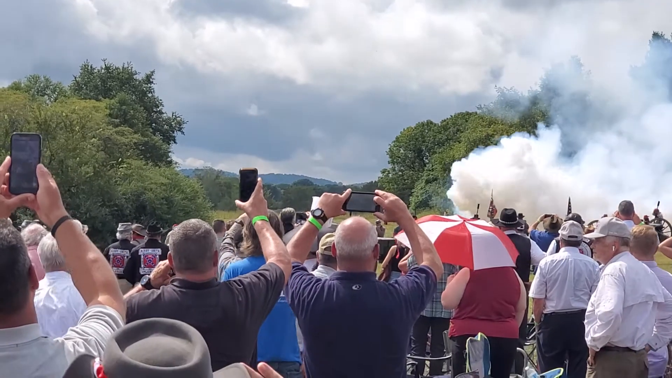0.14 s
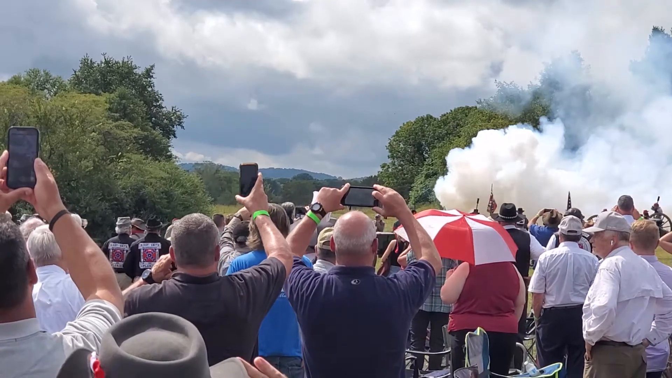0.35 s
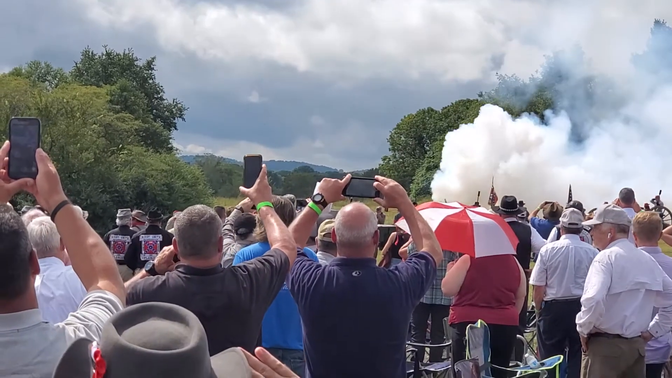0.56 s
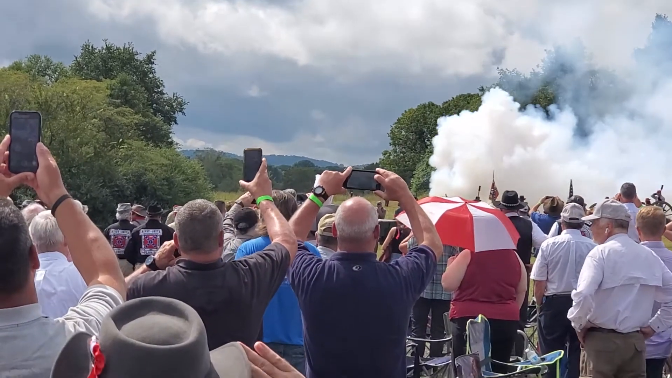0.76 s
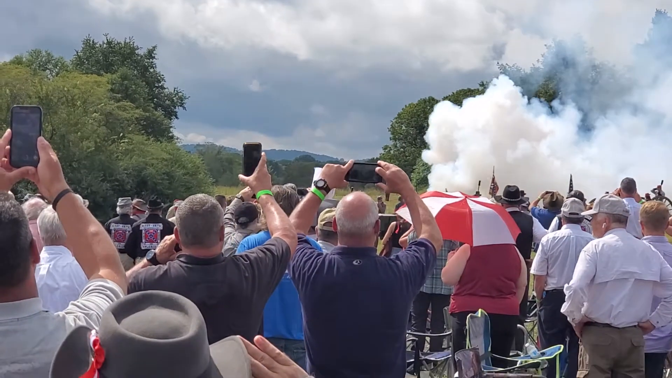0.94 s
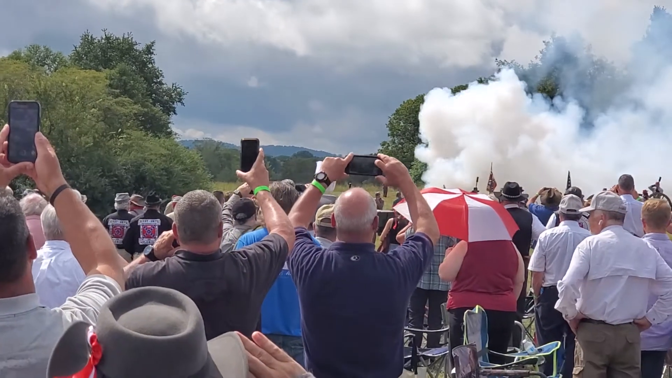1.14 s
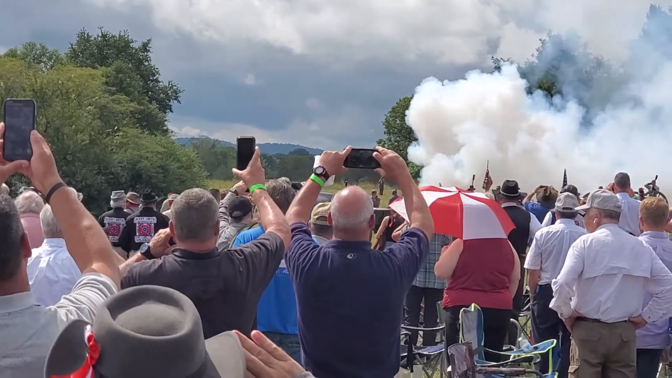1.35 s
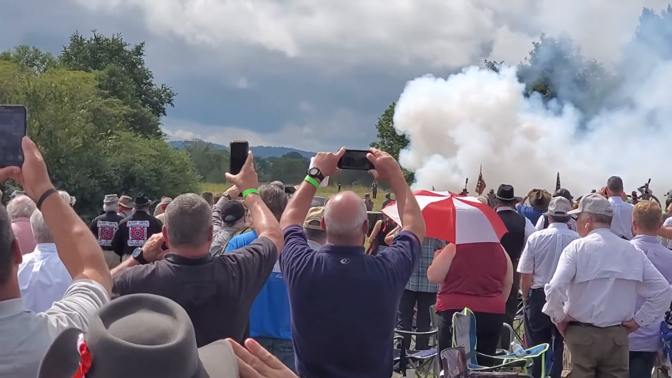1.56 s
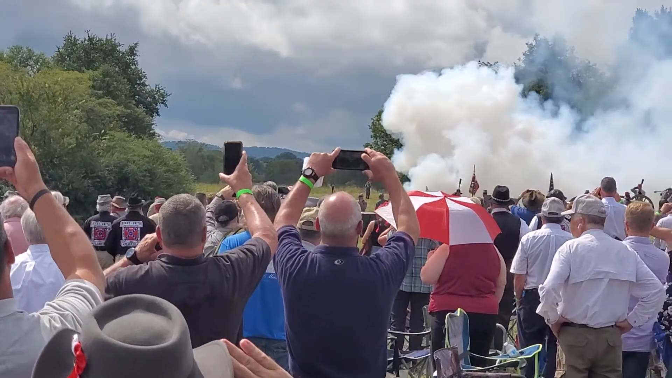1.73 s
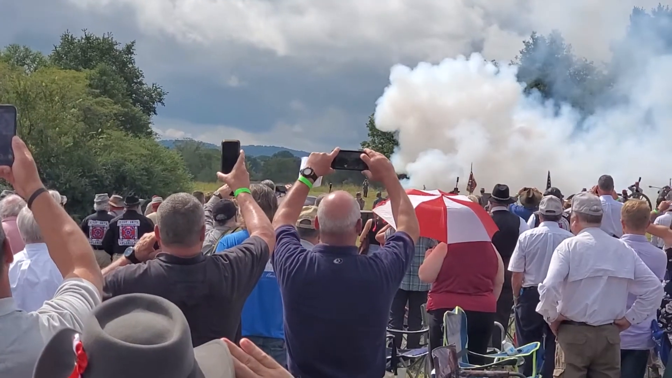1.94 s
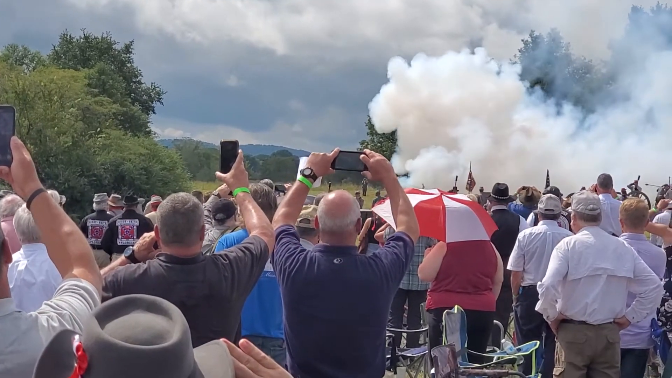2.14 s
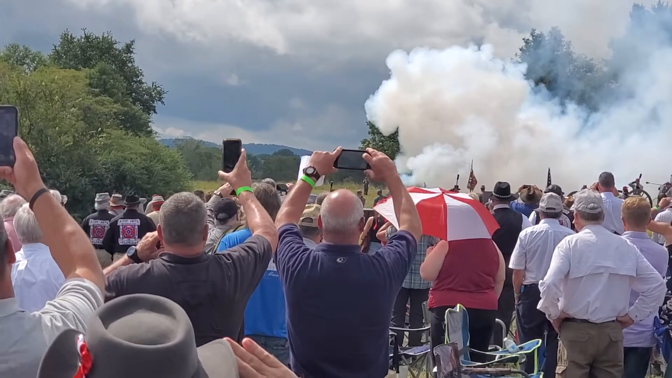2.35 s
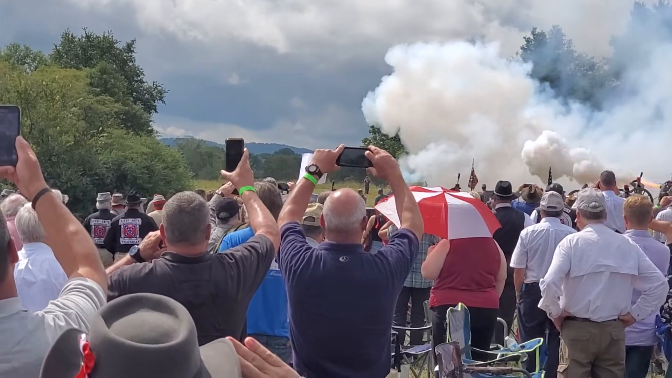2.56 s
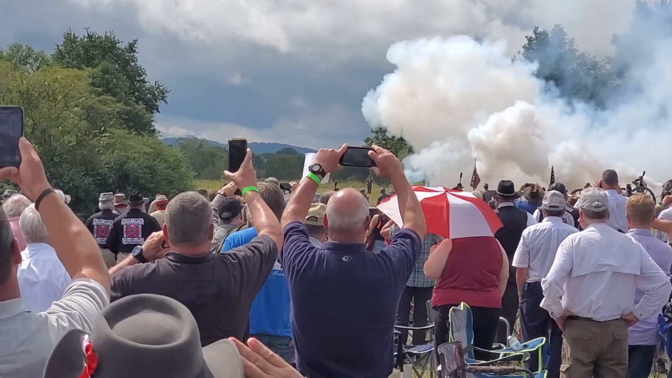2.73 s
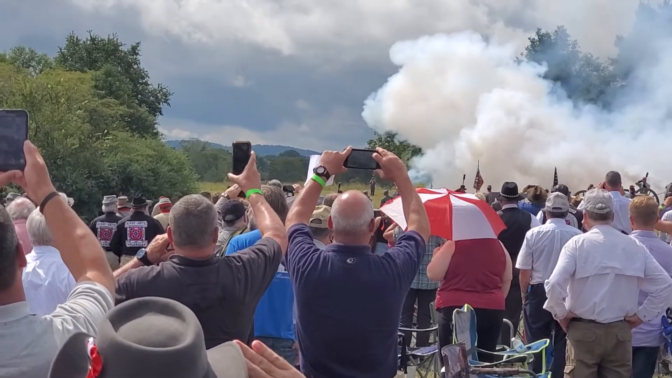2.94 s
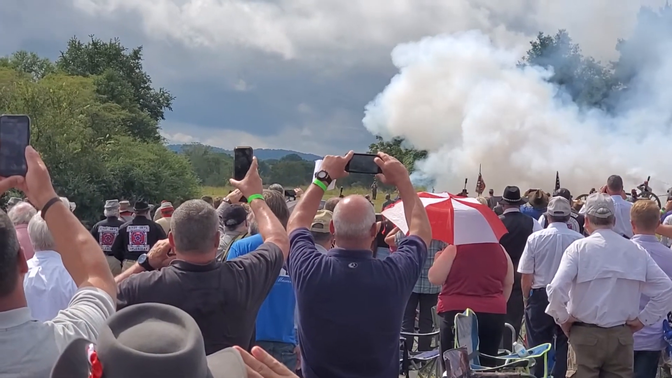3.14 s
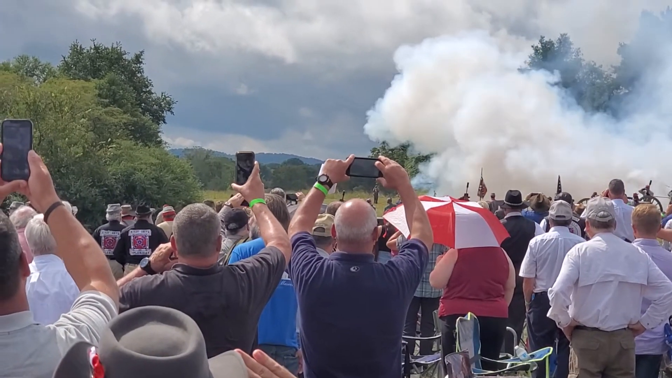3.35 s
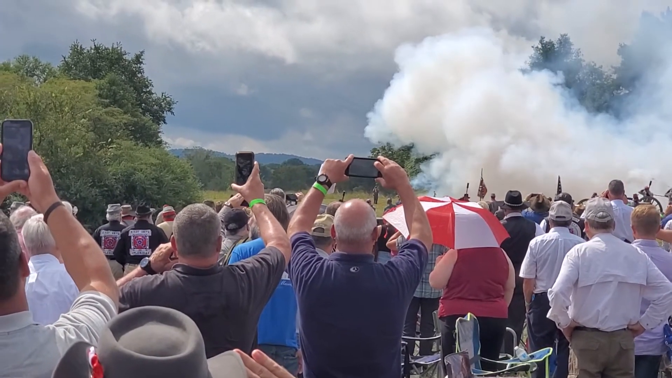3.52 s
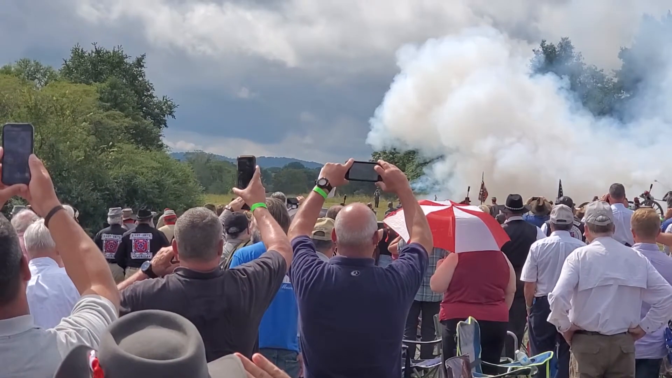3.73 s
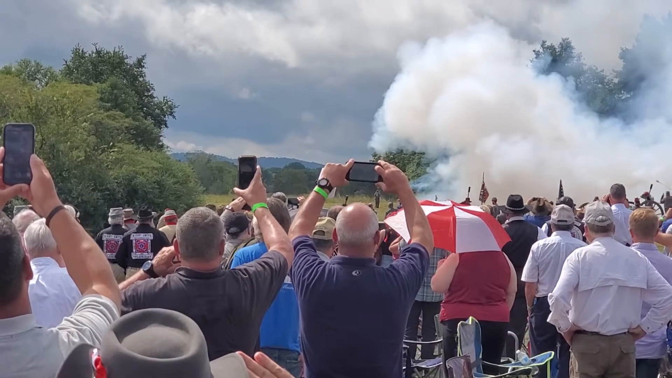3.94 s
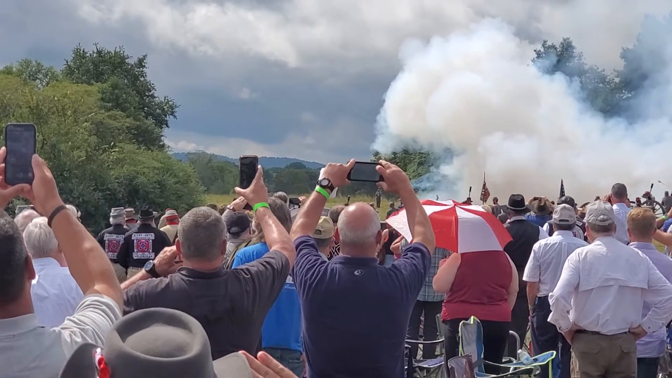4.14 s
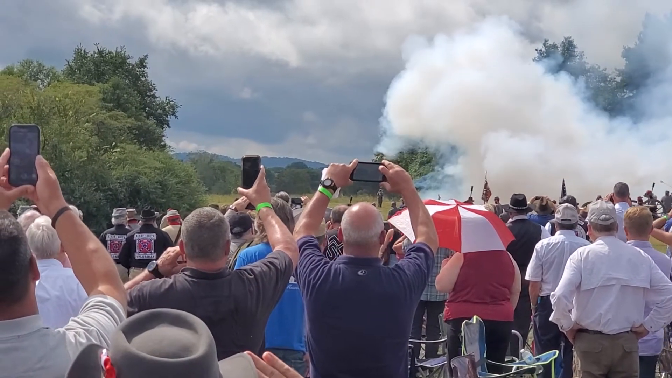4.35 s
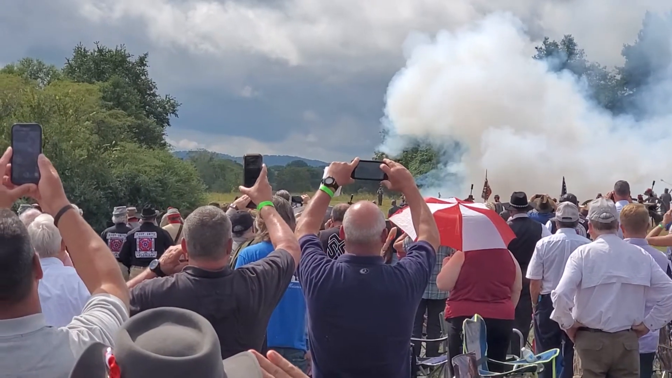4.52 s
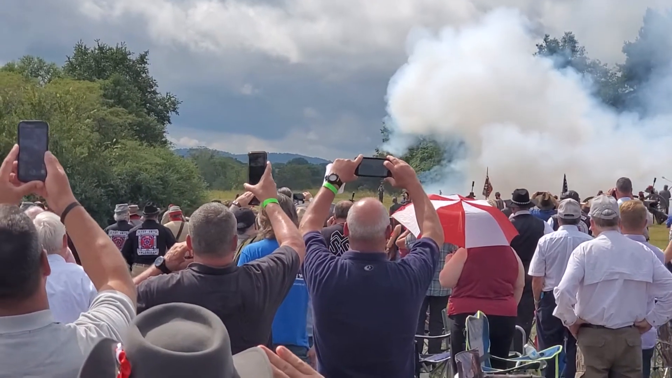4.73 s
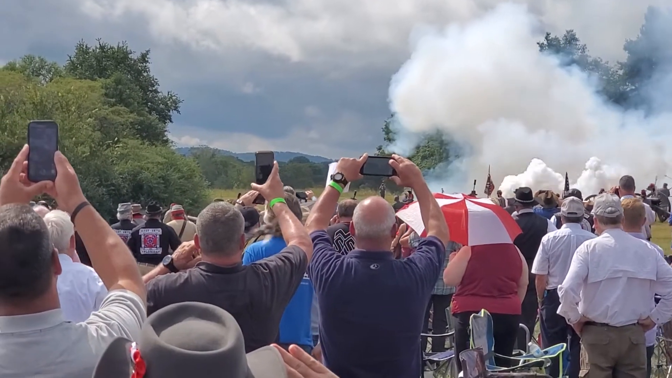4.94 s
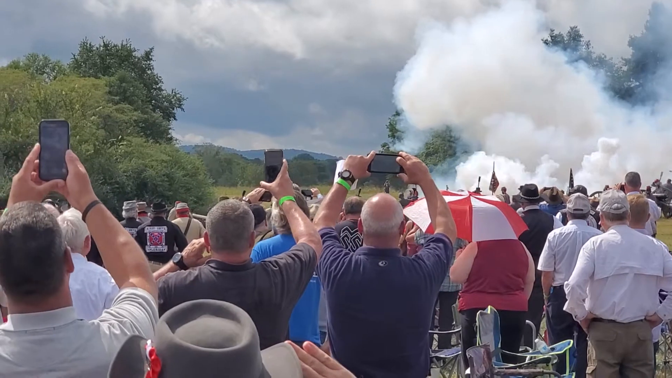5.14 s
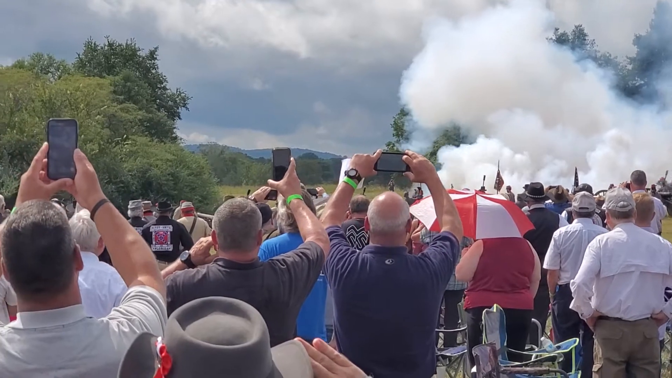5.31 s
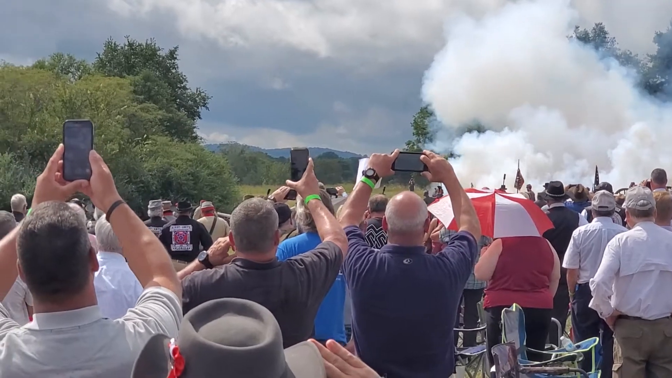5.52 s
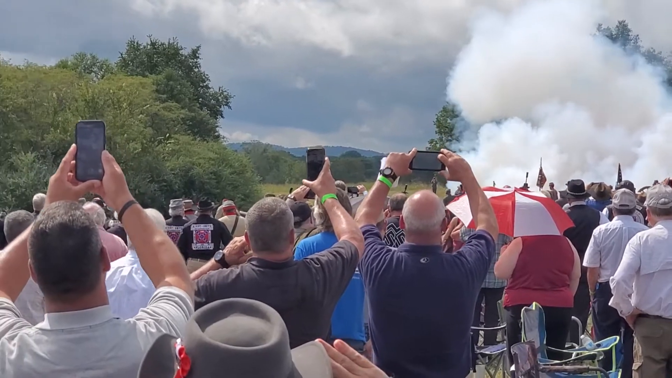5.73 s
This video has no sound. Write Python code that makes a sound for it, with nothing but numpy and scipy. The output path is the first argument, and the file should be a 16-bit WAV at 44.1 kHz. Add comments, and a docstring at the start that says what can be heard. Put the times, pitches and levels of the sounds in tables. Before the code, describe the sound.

Open meadow with tree lines and distant hills, heard on a phone's two microphones. At 0 seconds a black-powder cannon blast is already under way: a deep boom, then overlapping low thumps and a ragged leafy hiss, strongest around 0.3 to 0.8, with a sharper slap near 0.55. Echoes drift left, lose treble and sink into rolling rumble, with weak slaps near 1.5 and 2.15. A faint hiss swells just before the second shot at 2.66, a crisp double crack and low punch, with a somewhat lighter echo tail fading through 4 seconds. Small close clicks, louder left, come around 2.6, 3.85 to 4.0 and 4.9; thin wavering insect tones surface near 2, 4 and 4.9, over tiny rapid chirps and a soft steady air murmur. Faint slap echoes dot 4.2 to 4.75. At 5.06 the third shot lands, heavy and blunt, its thudding echoes, hiss and rumble still rolling at the end, about 6 seconds.

```python
"""A meadow ringed by tree lines and far hills, heard through the two ports of a phone: three black-powder cannon shots.
Each blast comes straight, as sharp fronts and low swings; the landscape returns it as thumps, boom, rumble and hiss.
Filtered two-port noise makes boom, rumble and hiss; the hiss loses treble and the echoes swing to the left.
Faint clicks, insect tones, chirps and a steady murmur of air fill the pauses."""
import sys
import numpy as np
from scipy import signal
from scipy.io import wavfile
from scipy.ndimage import uniform_filter1d, minimum_filter1d

SR = 44100
rng = np.random.default_rng(int(sys.argv[2]) if len(sys.argv) > 2 else 0)


def log_audio(samples):
    """Write samples as a 16-bit WAV file to the path given in sys.argv[1]."""
    # one column per channel
    frames = np.atleast_2d(samples).T
    # limit to full scale, then quantise
    limited = np.clip(frames, -1, 1)
    pcm = np.round(limited * 32767).astype(np.int16)
    wavfile.write(sys.argv[1], SR, pcm)


N = 259308  # samples

# firings that wake the landscape: start_s, rumble_db, boom_db, hiss_db, added_loss_db_per_khz,
# nearest_returns_db, slopes_lag_ms
SHOTS = [(-.073, 0, -0.5, 0, 0, -0.5, -4), (2.663, -5.5, -4.5, -4.5, 0, -7.5, 2.5),
         (5.062, -1, 0.5, 0, 0, -1, 4.5)]
# direct blasts: peak_s, hiss_db, loss_db_per_khz (at the peak), boom_db
MUZZLES = [(-.04, -16.5, 2, -5), (2.661, -29, 1.2, -27), (2.683, -16, 1.03, -12.5), (5.047, -37.5, .2, -20),
           (5.057, -22.5, 6, -11), (5.067, -17, 5, -3), (5.096, -20.5, 0.8, -5)]
# lows sent back by the landscape: after_shot_s, rumble_db, boom_db
LOWS = [(-.015, -56, -71), (.01, -3, -40), (.06, -17, -20), (.14, -23.5, -14), (.24, -22.5, -24),
        (.3, -18.5, -19), (.44, -10.5, -25), (.6, -17.5, -24.5), (.7, -14, -31), (.8, -17.5, -23),
        (.9, -24.5, -31.5), (1.02, -26.5, -39), (1.17, -21.5, -34), (1.5, -30, -43), (2.05, -28.5, -44),
        (2.3, -32.5, -45.5), (2.7, -34.5, -44.5), (6, -41, -89)]

MUZZLE_RISE_DB_PER_S, MUZZLE_FALL_S = 2200, 0.071


def amp(db):
    """Amplitude factor of a level in dB."""
    return 10 ** (np.asarray(db) / 20)


def read(points, hz):
    """Value of a spectrum table on a log-frequency axis."""
    f, value = np.transpose(points)
    return np.interp(np.log(hz + 1), np.log(f + 1), value)


def follow(rows, t):
    """Every column of a time table at the times t."""
    s, *columns = np.transpose(rows)
    return [np.interp(t, s, column) for column in columns]


def add(mix, start_s, sound):
    """Mix a sound in at its start, cut at the end of the mix."""
    part = mix[..., max(round(start_s * SR), 0):][..., :sound.shape[-1]]
    part += sound[..., :part.shape[-1]]


def summed(levels_db):
    """Level of several unrelated sounds heard together: powers add."""
    return 10 * np.log10(sum(amp(db) ** 2 for db in levels_db))


def grid(size):
    """Frame times and bin frequencies of short-time spectra."""
    frame_s = np.arange(4 * N // size + 5) * size / 4 / SR
    return frame_s, np.fft.rfftfreq(size, 1 / SR)[:, None]


def patches(size, frames, bins):
    """Smooth random field over frequency and time, rms 1."""
    t, hz = grid(size)
    field = rng.standard_normal((len(t), len(hz)))
    field = uniform_filter1d(field, frames, axis=0)
    field = uniform_filter1d(field, bins, axis=1).T
    return field / field.std()


def noise(colour, shape_db, lead_ms, like, size):
    """Coloured two-port noise shaped over time and frequency; path difference delays the right port by lead_ms."""
    # port imbalance, scaled by the shading below: pitch_hz, left_minus_right_db
    ports = [(300, 0.5), (520, 1), (1000, -4.5), (1700, -5.5), (2600, -0.5), (4400, 1.5), (8000, 2.5),
             (12000, -2.5)]
    t, hz = grid(size)
    a, b, c, d = rng.standard_normal((len(t), len(hz), 4)).T
    shared = a + 1j * b
    own = c + 1j * d
    like = np.clip(like, 0, 1) ** (hz / (hz + 900))  # long waves reach both ports alike
    late = np.exp(-2j * np.pi * hz * lead_ms / 1000)
    z = np.array([shared, late * (like * shared + np.sqrt(1 - like ** 2) * own)])
    shade = 0.7 + 0.65 * np.clip(lead_ms, 0, 0.3)  # the phone's body shades sound from the side more
    z *= amp(read(ports, hz) * shade * np.array([0.5, -0.5])[:, None, None])
    gain = amp(read(colour, hz))
    z *= gain / np.linalg.norm(gain) * amp(shape_db) * size ** 0.5
    return signal.istft(z, nperseg=size, noverlap=3 * size // 4, scaling="psd")[1][:, :N]


def bearing(t):
    """Left-port lead in ms and likeness of the ports, set by where sound arrives from after the latest shot."""
    # after_shot_s, left_lead_ms, likeness (0-1)
    directions = [(0, -0.11, .6), (.12, -0.086, .1), (.128, .4, 0.76), (.175, .4, .7), (.2, .1, 0.2),
                  (.215, 0.11, 0.4), (.34, .11, 0.15), (.39, 0.066, 0.64), (.5, 0.089, 0),
                  (.62, 0.27, 0.55), (.82, .3, 0.16), (.99, 0.19, 0), (1.02, 0.51, 0.8), (1.25, 0.47, 0.77),
                  (1.5, 0.486, 0.2), (2.0, 0.41, 0.44), (2.8, 0.45, 0.4)]
    fired_s = np.transpose(SHOTS)[0]
    return follow(directions, t - fired_s[np.searchsorted(fired_s, t) - 1])


def muzzle(t, peak_s, fall_db):
    """Relative level in dB around a blast: a steep rise, then a fall that slows down."""
    rise_db = -MUZZLE_RISE_DB_PER_S * np.clip(peak_s - t, 0, 0.1)
    return rise_db - fall_db * np.log1p(np.maximum(t - peak_s, 0) / MUZZLE_FALL_S)


def cracks():
    """A push and its suction, then a short spray of ground reflections, dulled by the way travelled."""
    # sharp fronts of blasts and slap echoes: start_s, level_db (before filters), blur_ms, spray_t60_s
    fronts = [(0.546, -11.5, 0.058, .03), (1.507, -17, 0.14, 0.095), (2.145, -25.5, 0.1, 0.018),
              (2.6597, -7.5, 0.041, 0.011), (2.6809, -0.5, 0.055, 0.13), (4.162, -24.5, 0.078, 0.054),
              (4.244, -33, 0.07, 0.049), (4.532, -24, 0.15, 0.014), (4.752, -26.5, .1, 0.022),
              (5.0685, 6, 0.19, 0.033), (5.0714, -3.5, 0.02, 0.018), (5.085, -1.3, 0.025, 0.085)]
    pulse_s, bounce_s = 0.00085, 0.00151
    out, t = np.zeros((2, N)), np.arange(6000) / SR
    spray = rng.standard_normal((len(fronts), 2, len(t)))
    for (start_s, level_db, blur_ms, t60_s), grit in zip(fronts, spray):
        lead_s = bearing(start_s)[0] / 1000
        delay_s = np.array([[max(-lead_s, 0)], [max(lead_s, 0)]])
        u = np.maximum(t - delay_s, 0) / pulse_s
        grit = (grit + 0.49 * grit[0]) * amp(-15.0 - 60 * t / t60_s)
        front = ((1 - u) * np.exp(-u) + grit) * (u > 0)
        front = front + 0.86 * np.roll(front, round(bounce_s * SR), axis=1)  # bounce off the ground
        keep = np.exp(-1000 / (blur_ms * SR))
        front = signal.lfilter([(1 - keep) ** 2], [1, -2 * keep, keep ** 2], front)
        add(out, start_s, amp(level_db) * front)
    return signal.sosfilt(signal.butter(2, 300, "high", fs=SR, output="sos"), out)


def thumps():
    """The blast, and each broad surface that throws it back, give short low swings: cosines in a bell."""
    # swings of the blast itself: centre_s, level_db, pitch_hz, bell_sigma_ms
    blows = [(2.6805, -1, 95, 4.3), (2.683, -14.5, 702, 3.3), (2.694, -2.5, 91, 4.7),
             (2.709, -4.5, 80, 4.4), (5.058, -9.5, 71, 9.1), (5.069, -6, 347, 4.1),
             (5.086, -29.5, 127, 6.6), (5.101, -8, 304, 2), (5.118, -10, 260, 3)]
    # reflecting surfaces: after_shot_s, pitch_hz, bell_sigma_ms, gun_1_db, gun_2_db, gun_3_db
    slopes = [(.072, 125, 2.4, -13, -20, -1), (.115, 141, 3.7, -6, -35, -7),
              (0.153, 110, 3.6, -1.5, -14.5, -4), (.19, 125, 4.6, -6, -27, -3),
              (.225, 121, 4, -20, -27, -6), (.283, 121, 2, -5, -12, -15), (0.316, 76, 8, -3, -5, 0),
              (0.407, 98.6, 6.7, -1.5, -8.5, -7), (0.443, 82, 11, -9, -9, -10),
              (0.501, 90, 4.8, -3.5, -7.5, -2), (0.574, 88, 6.9, -12, -7.5, -8),
              (0.637, 94, 6.6, -6, -11, -16), (.695, 67, 4, -9.5, -24, -7), (.748, 90, 6.8, -2.5, -6, -7),
              (0.818, 84, 7.1, -7, -13, -8.5), (.93, 71, 13.5, -16, -17, -15),
              (0.999, 75, 12.5, -13, -39, -15), (1.147, 89, 9.4, -12, -15.5, -10),
              (1.181, 95, 6.7, -11.5, -15.5, -10), (1.234, 87, 8.7, -14, -20, -14),
              (1.312, 87, 7.2, -16.5, -31, -16), (1.381, 74, 4, -22, -26, -15.5),
              (1.788, 61.4, 7.2, -22.5, -18, -20), (1.912, 77, 13, -17.5, -27.5, -20),
              (2.069, 67, 4.2, -13, -20.5, -13)]
    out = np.zeros(N)
    t = np.arange(-2400, 2400) / SR
    returns = [(shot_s + late_s + lag_ms / 1000, db[gun], hz, ms)
               for gun, (shot_s, *_, lag_ms) in enumerate(SHOTS)
               for late_s, hz, ms, *db in slopes]
    for centre_s, level_db, pitch_hz, sigma_ms in blows + returns:
        swing = np.cos(2 * np.pi * pitch_hz * t) * np.exp(-0.5 * (1000 * t / sigma_ms) ** 2)
        swing = swing * signal.windows.tukey(len(t), 0.5)
        swing = amp(level_db) * (swing - swing.mean() * 2 * np.hanning(len(t)))  # no net pressure
        start_s = centre_s + t[0]
        add(out, start_s, swing[max(-round(start_s * SR), 0):])
    return out


def boom():
    """The chesty middle of the blast and its echoes, noise lumpy from trunk to trunk."""
    # pitch_hz, relative_level_db
    colour = [(60, -10.5), (110, -0.5), (160, 4.5), (230, -7.5), (310, -9.5), (390, -17), (480, -30),
              (600, -24.5), (900, -55), (2000, -58)]
    near_s, fall_db = 0.17, 18
    t = np.arange(N) / SR
    levels_db = []
    for shot_s, _, boom_db, _, _, near_db, _ in SHOTS:
        near = np.clip(2 - (t - shot_s) / near_s, 0, 1)  # full until near_s, gone at twice that
        levels_db.append(follow(LOWS, t - shot_s)[1] + boom_db + near_db * near)
    for peak_s, _, _, boom_db in MUZZLES:
        levels_db.append(boom_db + muzzle(t, peak_s, fall_db))
    lumps_db = 3.02 * patches(size=1024, frames=4, bins=8)
    lead_ms, _ = bearing(grid(size=1024)[0])
    return amp(summed(levels_db)) * noise(colour, lumps_db, lead_ms, 0.81, size=1024)


def hiss():
    """Leaves scatter the crack into noise; the air takes more on longer paths, steeply so in the treble."""
    # foliage returns: after_shot_s, level_db, loss_db_per_khz (slope at 4 kHz), trunk_knock_db
    leaves = [(.1, -58, -1, 0), (.122, -47, 1, 2), (.132, -34, 0.45, -2), (.165, -34.5, 0.5, 1),
              (.19, -42, 1.5, -1), (.21, -41, 0.5, -3), (.225, -30, -0.13, -6), (.26, -26.5, 0, 5),
              (.3, -25, 0.53, 8), (.36, -26.5, 1, -3), (.41, -17.5, 1.45, -4), (.5, -27, 1.4, -1.5),
              (.555, -27.5, 1.9, 4), (.59, -30, 1.54, 2), (.62, -30.5, 2, 6), (.655, -33.5, 1.5, 4),
              (.7, -29, 2, -3.5), (.745, -24, 2.6, 5), (.785, -27, 2, 1), (.82, -25.5, 2.5, 6.5),
              (.88, -32, 3, 3), (.99, -44, 4, 0), (1.02, -38.5, 1.63, -2), (1.17, -33.5, 3, -0.5),
              (1.28, -36.5, 3, -2), (1.6, -42, 2.5, -4), (2.0, -47, 6, 1.5), (2.25, -49.5, 7, -8.5),
              (6, -83, -2, 3)]
    # pitch_hz, relative_level_db
    colour = [(200, -38), (450, -9.5), (620, 0.5), (850, -2.5), (1300, -1), (2500, -1), (4000, -2),
              (4900, -8), (5800, -2), (8300, -4), (9500, -13.5), (12500, -5), (14500, -10), (16000, -11)]
    trunk_hz, trunk_octaves = 1080, 0.99
    fall_db, dulling_db_per_khz = 27, 0.9
    swell_s, swell_rise_s, swell_db, swell_loss_db_per_khz = 2.36, 0.12, -43, 2
    t, hz = grid(size=256)
    khz = ((hz / 1000) ** 1.5 - 2 ** 1.5) / 3  # bent axis: 0 at 2 kHz, slope 1 at 4 kHz
    # a faint hiss swells just ahead of the second shot
    swell = swell_db - 40 * np.exp(-np.maximum(t - swell_s, 0) / swell_rise_s)
    parts_db = [swell - 99 * (t > SHOTS[1][0]) - swell_loss_db_per_khz * khz]
    trunks = np.exp(-(np.log2((hz + 1) / trunk_hz) / trunk_octaves) ** 2)
    for shot_s, _, _, hiss_db, added_loss, *_ in SHOTS:
        level_db, loss, knock_db = follow(leaves, t - shot_s)
        echo_db = level_db + hiss_db - (loss + added_loss) * khz + knock_db * trunks
        parts_db.append(echo_db - 99 * (t < shot_s))
    for peak_s, hiss_db, loss, _ in MUZZLES:
        loss = loss + dulling_db_per_khz * np.clip((t - peak_s) / MUZZLE_FALL_S, 0, 2)
        parts_db.append(hiss_db + muzzle(t, peak_s, fall_db) - loss * khz)
    crowns_db = 1.54 * patches(size=256, frames=30, bins=5)  # each tree answers in its own colour
    # trunks and boughs slap back briefly
    slaps_db = 1.106 * np.minimum(patches(size=256, frames=8, bins=12) ** 2, 7)
    return noise(colour, summed(parts_db) + crowns_db + slaps_db, *bearing(t), size=256)


def rumble():
    """Many far slopes return the lowest part of the blast, dense and rolling."""
    # pitch_hz, relative_level_db
    colour = [(15, -20), (30, -29), (50, 6.5), (75, 4), (110, -5), (170, -17), (300, -51.5), (600, -119)]
    t = np.arange(N) / SR
    level_db = summed(follow(LOWS, t - shot_s)[0] + rumble_db for shot_s, rumble_db, *_ in SHOTS)
    lead_ms, _ = bearing(grid(size=4096)[0])
    return amp(level_db) * noise(colour, 0, lead_ms, 0.95, size=4096)


def ticks():
    """Clicks close by: a short rough ring over a puff of the highest treble, louder in the left port."""
    # start_s, level_db (before port gains)
    clicks = [(2.5485, -49.5), (2.5755, -51.5), (2.6234, -45), (3.852, -40), (3.9074, -54.5), (3.9958, -41),
              (4.0114, -41.5), (4.8724, -48), (4.9685, -46.5)]
    ring_hz, rise_s, t60_s = 6300, 0.001, 0.035
    out, t = np.zeros(N), np.arange(1500) / SR
    draws = rng.standard_normal((len(clicks), len(t) + 3))
    soft = np.minimum(t / rise_s, 1) * amp(-60 * t / t60_s)
    for (start_s, level_db), draw in zip(clicks, draws):
        ring = 4.6 * uniform_filter1d(draw[3:], size=40) * np.sin(2 * np.pi * ring_hz * t)
        puff = 0.093 * np.diff(draw, 3)
        add(out, start_s, amp(level_db) * soft * (ring + puff))
    return out * amp([[2.0], [-3.0]])


def insect():
    """Two thin sine tones whose pitch and level waver at random."""
    # before waver and port gains: time_s, high_tone_db, low_tone_db
    calls = [(1.6, -92, -95), (1.97, -67, -91), (2.4, -87, -88), (3.85, -100, -100), (3.95, -58, -81),
             (4.3, -80, -90), (4.42, -65, -80), (4.6, -70, -64), (4.93, -64, -65), (5.04, -67, -92),
             (5.1, -95, -93.5)]
    # centre pitches: high_hz, low_hz
    tones_hz = [5865, 2859]
    sink_hz, waver_hz, waver_db = 200, 22, 3.8
    t = np.arange(N) / SR
    waver = uniform_filter1d(rng.standard_normal((N, 4)), 900, 0).T * 30  # rms 1
    # the high tone sinks as its last call ends
    sink = sink_hz * np.clip((t - 4.9) / 0.14, 0, 1) * [[1], [0]]
    pitch_hz = np.transpose([tones_hz]) - sink + waver_hz * waver[:2]
    turns = np.cumsum(pitch_hz, axis=1) / SR
    level_db = np.array(follow(calls, t)) + waver_db * waver[2:]
    return (amp(level_db) * np.sin(2 * np.pi * turns)).sum(0) * amp([[1.5], [-1.5]])


def cricket():
    """Tiny falling chirps, evenly spaced, from the grass: sine glides in a bell."""
    chirps_per_s, level_db = 16.5, -80.0
    t = np.arange(N) / SR
    since = (t - 0.035) % (1 / chirps_per_s)
    glide = np.sin(2 * np.pi * (8700 * since - 9000 * since ** 2))
    return amp(level_db) * glide * np.exp(-((since - 0.015) / 0.0071) ** 2)


def air():
    """Steady open-air murmur of leaves and distance: stationary coloured noise."""
    # pitch_hz, relative_level_db
    colour = [(90, -29), (160, -21), (300, -3.5), (600, -2.5), (1000, -9), (2200, -18), (4400, -24.5),
              (6000, -16), (8500, -32.5), (9300, -44), (12000, -40), (15600, -36)]
    return noise(colour, shape_db=-52, lead_ms=0.259, like=0.9, size=512)


def scene():
    """Blasts and their returns over the small sounds of the meadow."""
    blasts = cracks() + thumps() + boom() + hiss() + rumble()
    return blasts + ticks() + insect() + cricket() + air()


def record(dry):
    """A limiter turns the gain down just ahead of each peak and lets go gently; then the band limit."""
    ceiling, edge_hz = 0.93, 15720
    room = np.minimum(ceiling / (abs(dry).max(0) + 1e-9), 1)
    gain = uniform_filter1d(minimum_filter1d(room, size=801), size=400)
    lowpass = signal.firwin(1023, edge_hz, window=("kaiser", 9), fs=SR)
    return signal.oaconvolve(dry * gain, lowpass[None], "same")


dry = scene()
out = record(dry)
log_audio(out)
```